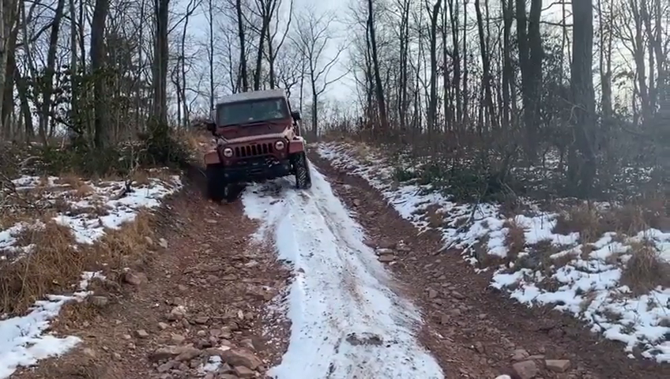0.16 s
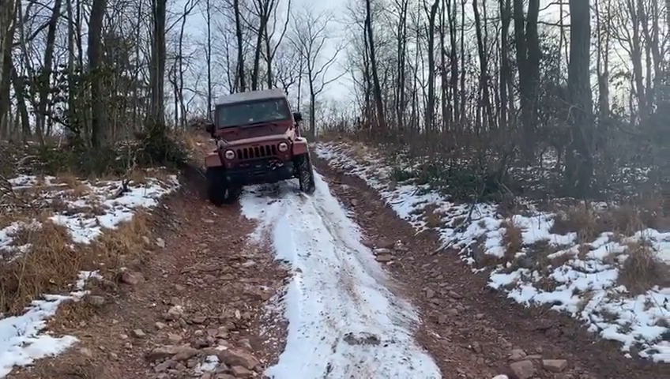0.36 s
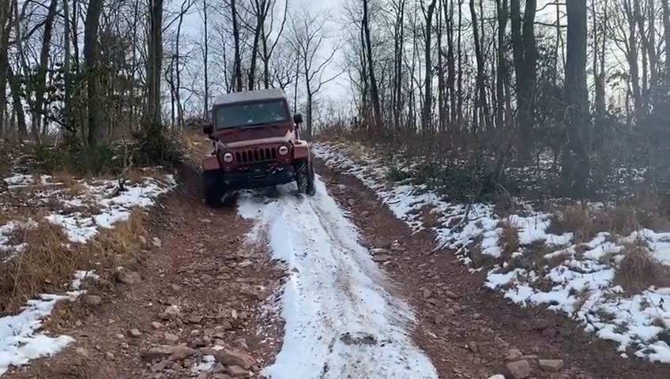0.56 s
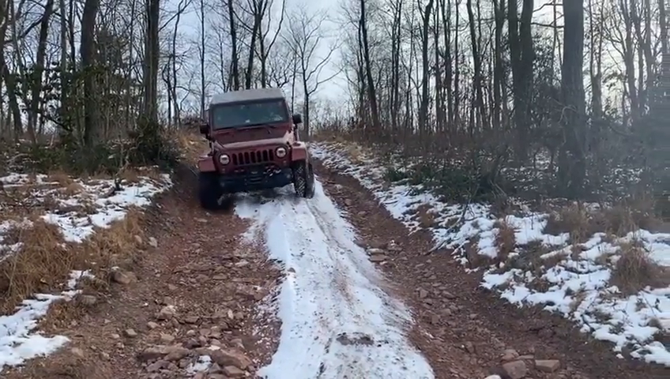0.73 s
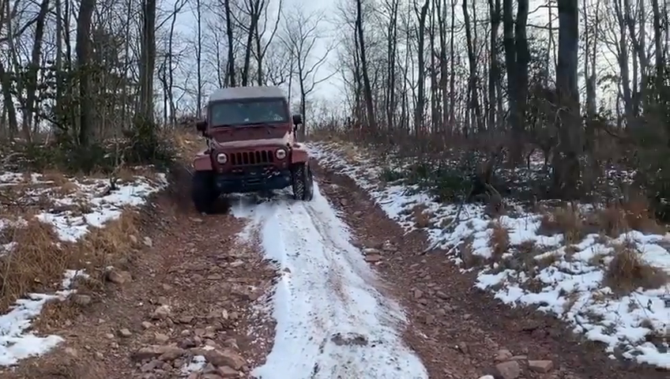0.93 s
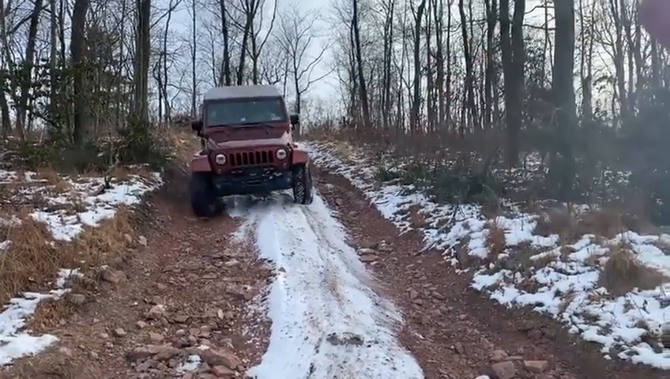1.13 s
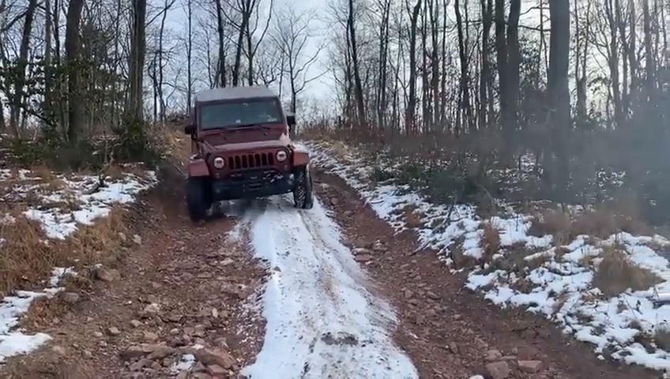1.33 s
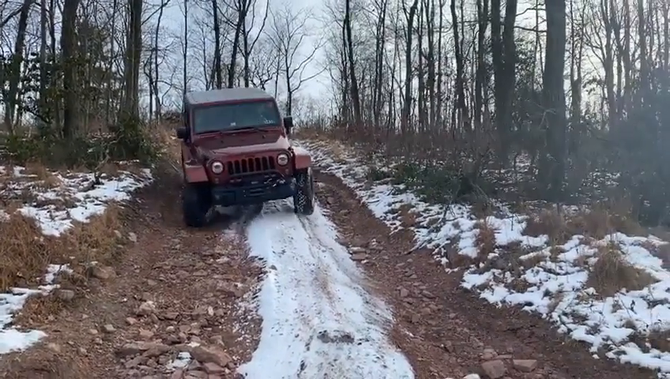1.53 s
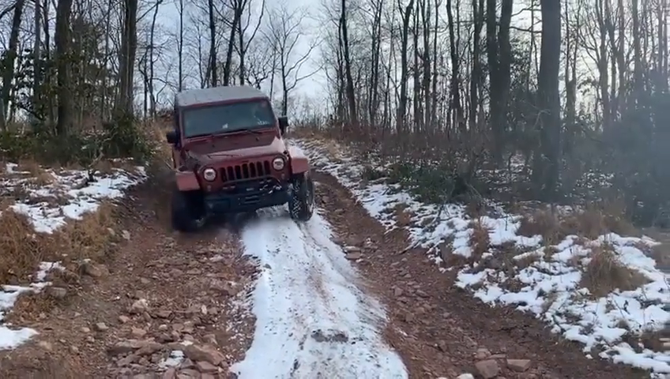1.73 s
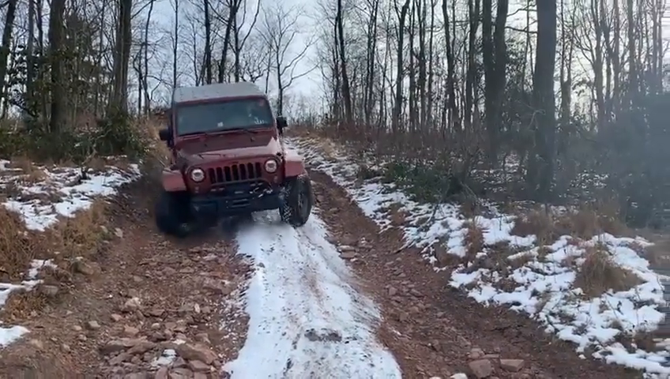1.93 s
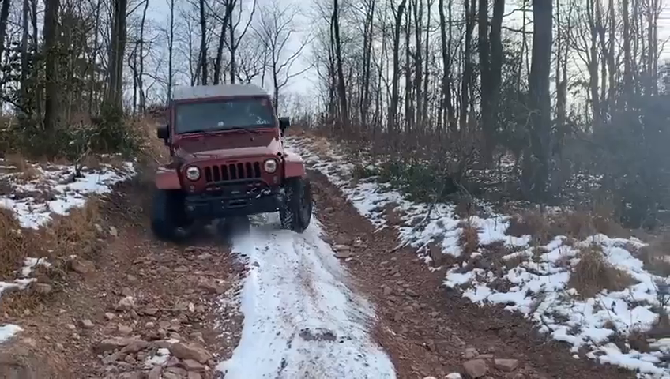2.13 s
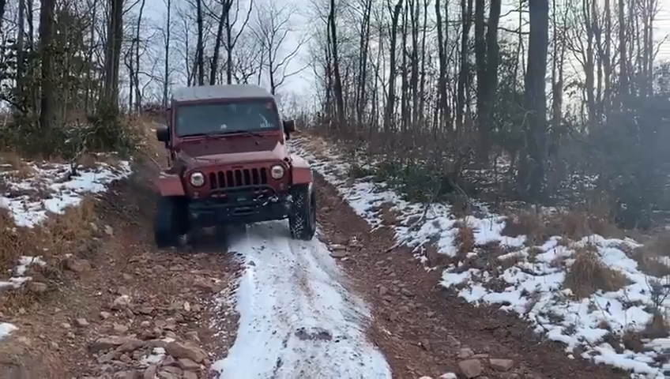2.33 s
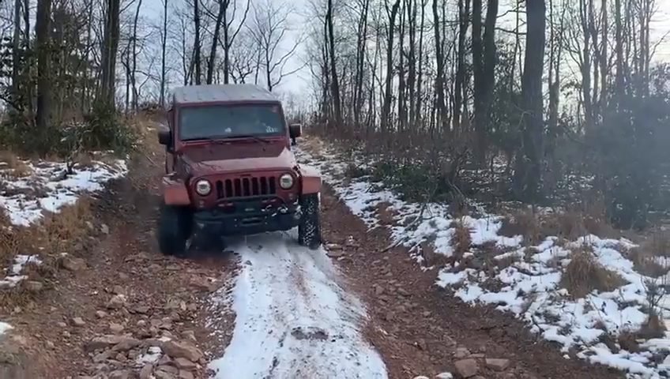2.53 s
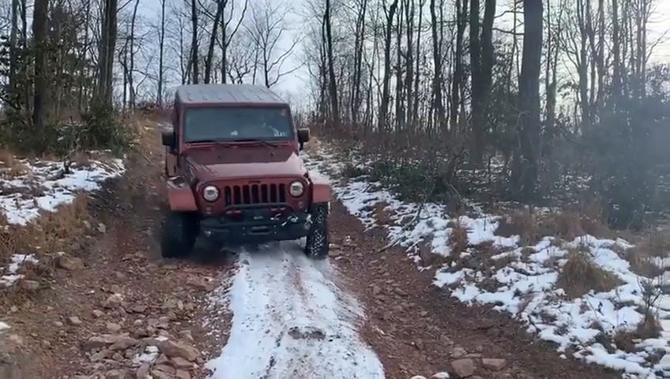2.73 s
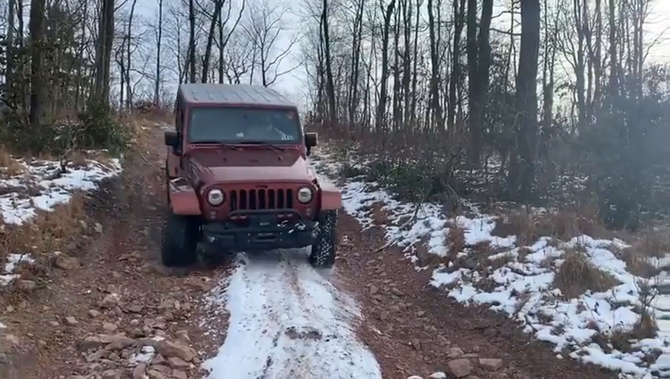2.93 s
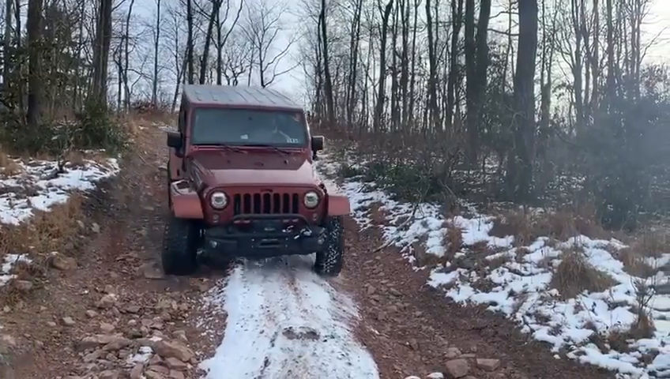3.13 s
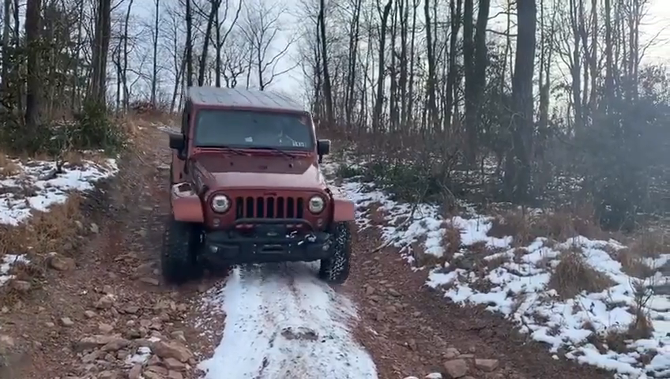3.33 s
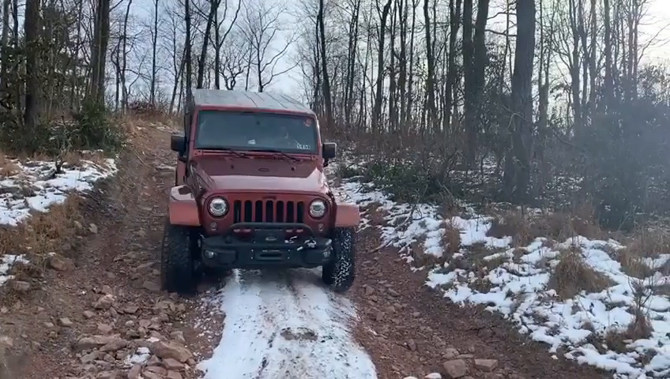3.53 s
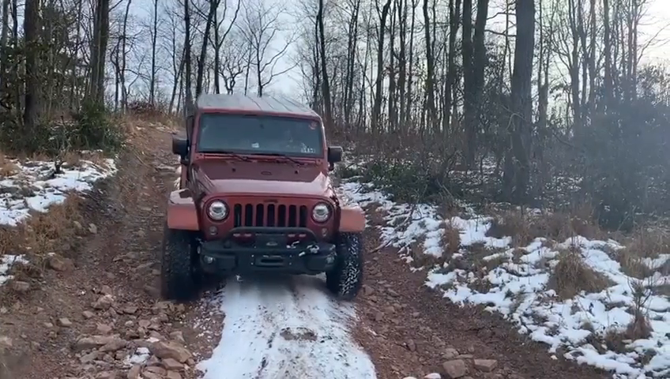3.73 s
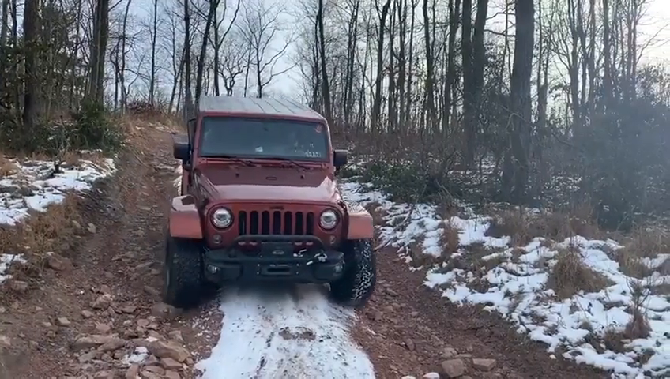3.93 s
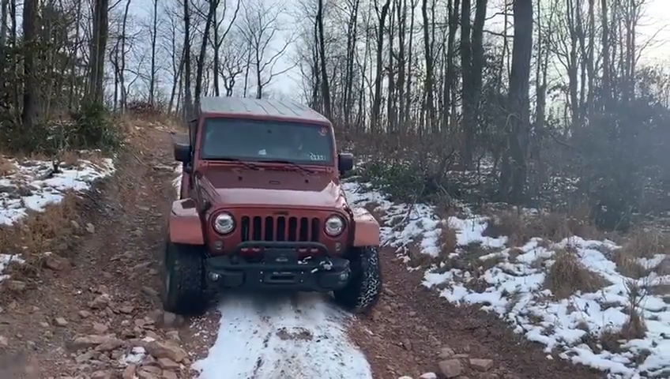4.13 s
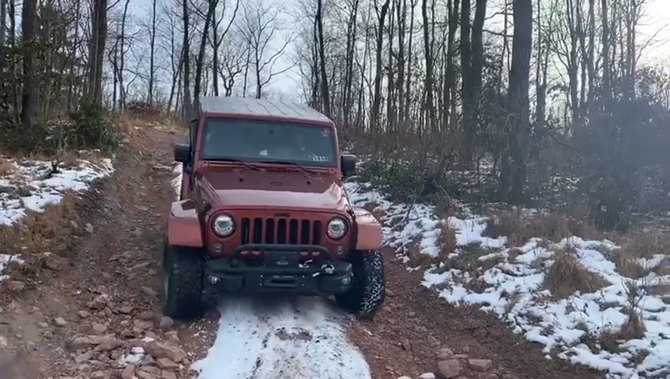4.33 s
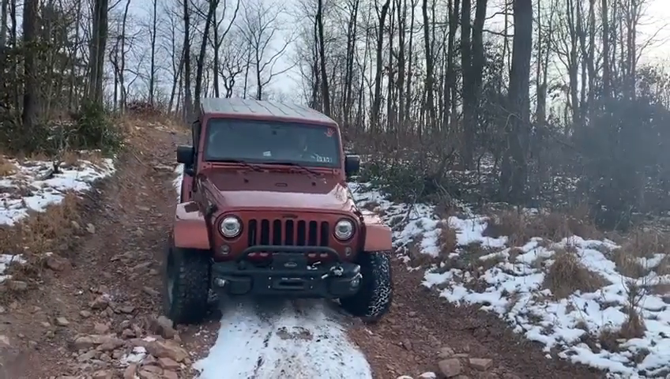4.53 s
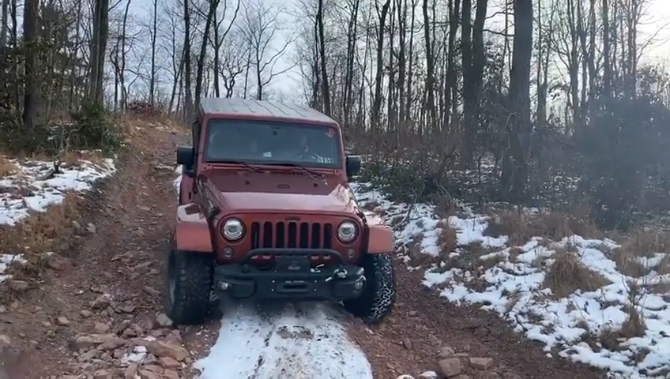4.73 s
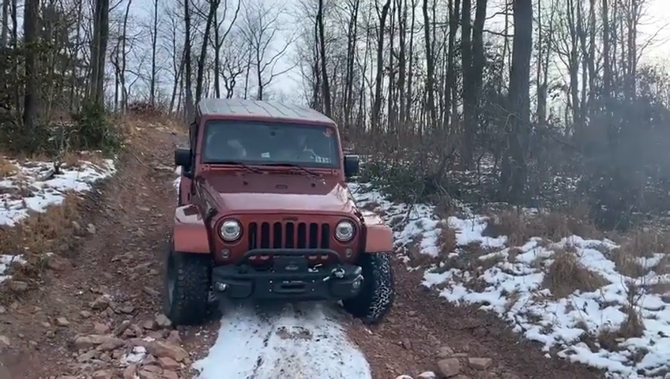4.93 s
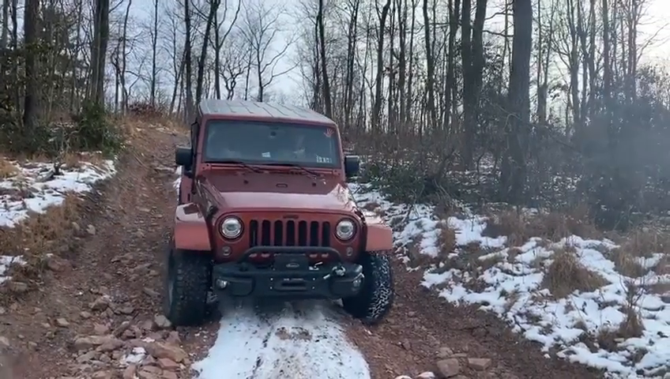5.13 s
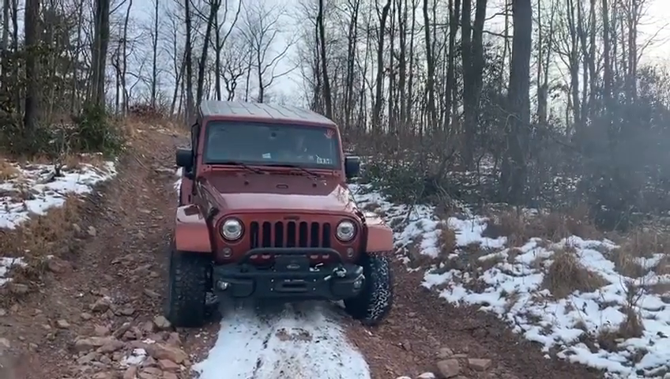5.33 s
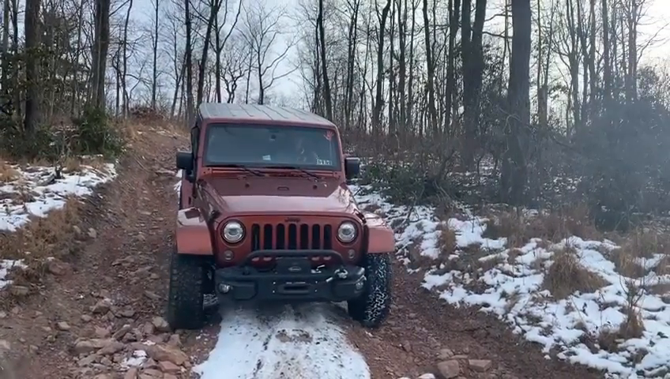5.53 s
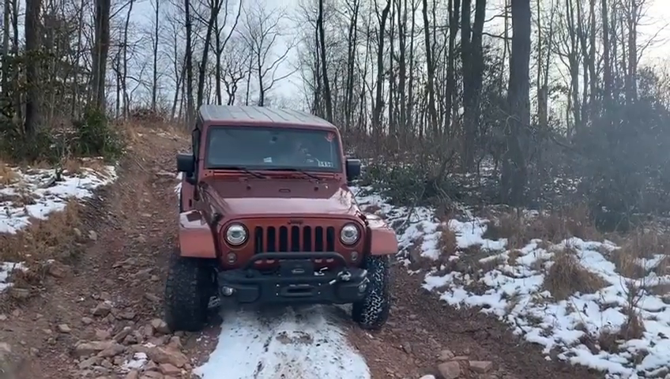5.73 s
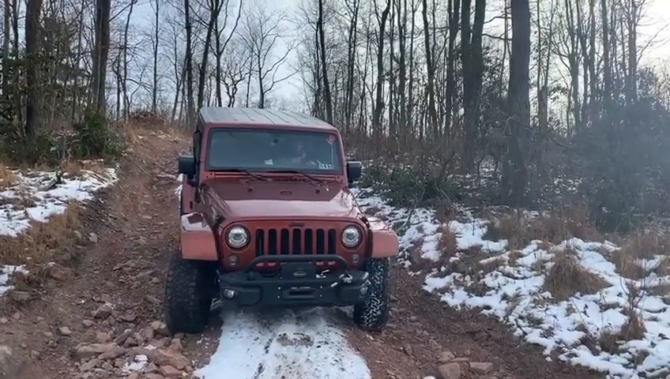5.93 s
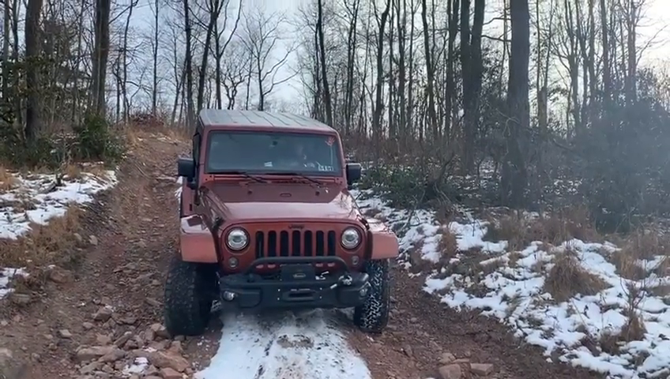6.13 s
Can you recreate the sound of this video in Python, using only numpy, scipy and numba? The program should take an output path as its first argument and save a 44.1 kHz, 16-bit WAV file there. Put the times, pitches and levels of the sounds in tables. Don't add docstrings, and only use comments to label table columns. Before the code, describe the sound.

A heavy off-road vehicle descends a stony, icy forest track towards a phone microphone, its engine idling low and uneven under a soft fan and woodland hiss. From 0 s, stones knock hollow on the tyres, with a strong thump at 0.1 s; crunching crust and sharp snaps gather from 0.5 to 1 s. Around 1.7-2.5 s the rolling is densest: heavy double thump, gritty skids, bright splinters, clods crushed. Small bright chips ping near 2.9 s. From 3 to 4.6 s, irregular crunches, cracks, body booms and stone knocks continue, ending in a blunt thump at 4.7 s. By 5 s it has halted; idle remains, with small cracks near 5.3 s. The fan swells slightly from 5.6 s, a dull crack comes near 5.8 s, and the brake groans steadily, low and quiet, until 6.05 s. A last small crunch and settling knock come near 6.15 s. Trees return a faint short echo.

```python
import sys
import numpy as np
from scipy import signal
from scipy.fft import rfft, irfft
from scipy.io import wavfile
from scipy.ndimage import uniform_filter1d
from numba import njit

SR = 44100
rng = np.random.default_rng(int(sys.argv[2]) if len(sys.argv) > 2 else 0)


def gain_from_decibels(decibels):
    exponent = np.asarray(decibels, float) / 20
    return 10 ** exponent


def waveform_to_disk(signal):
    frames = np.transpose(np.atleast_2d(signal))
    scaled = np.clip(frames, -1, 1) * 32767
    samples = np.round(scaled).astype(np.int16)
    wavfile.write(sys.argv[1], SR, samples)


N = 276859

SPLIT_HZ = 2100
# [f/Hz, density/dB per Hz]
CRUST = [(300, 2), (420, -0.5), (600, -2.5), (960, -3), (1140, -10), (1600, -7.5), (1900, -15.5),
         (2250, -29), (3500, -31.5), (4300, -34), (5400, -29.5), (6500, -30), (7600, -32), (9000, -40.5)]
# [t/s, peak level/dB, ring f/Hz]
SNAPS = [(0.462, -34, 1100), (0.574, -29, 942), (0.601, -34, 842), (0.667, -32, 856), (0.755, -31, 950),
         (0.802, -23, 1090), (0.827, -23, 896), (0.902, -28, 1590), (0.944, -31, 1650), (1.683, -21, 1640),
         (2.09, -26, 939), (2.222, -22, 1420), (2.384, -25, 926), (2.435, -28, 947), (2.459, -23.5, 1750),
         (2.476, -25.5, 974), (2.493, -26, 934), (2.514, -24, 1780), (2.534, -29, 886), (2.6, -25, 1870),
         (2.79, -26, 1650), (2.92, -31, 1610), (2.987, -28.5, 1640), (3.073, -24, 1700), (3.137, -21, 1020),
         (3.454, -20.5, 1760), (3.51, -30, 853), (3.527, -32, 1590), (3.577, -31, 750), (3.657, -25, 900),
         (3.661, -24, 1660), (3.703, -24, 703), (3.725, -22.5, 703), (3.74, -27, 1550),
         (3.795, -25.5, 1320), (3.922, -32, 770), (3.973, -27, 751), (4.08, -23.5, 789),
         (4.16, -23.5, 1560), (4.222, -30, 735), (4.289, -28, 1060), (4.357, -28, 829), (4.406, -29, 1040),
         (4.476, -28, 786), (4.498, -31, 1080), (4.523, -29, 1020), (4.67, -27, 1900), (4.698, -29, 1030),
         (5.248, -33, 1020), (5.297, -29, 970), (6.141, -33, 1040)]


def level(x, db):
    return x * gain_from_decibels(db) / np.sqrt(np.mean(x ** 2))


@njit
def svf(x, hz, width):
    y = np.empty(len(x))
    band, low = 0., 0.
    g, damping = np.tan(np.pi * hz / SR), width / hz
    for i in range(len(x)):
        v = (band + g * (x[i] - low)) / (1 + g * (g + damping))
        band = 2 * v - band
        low = low + 2 * g * v
        y[i] = damping * v
    return y


def ring(x, modes):
    return sum(gain_from_decibels(db) * svf(x, 1. * hz, 1. * width) for hz, width, db in modes)


def colour(x, points):
    hz, db = np.transpose(points)
    grid = np.fft.rfftfreq(4096, 1 / SR)
    curve_db = np.interp(np.log(grid + 1), np.log(hz), db)
    cepstrum = irfft(np.log(gain_from_decibels(curve_db)))
    cepstrum[1:2048] *= 2
    cepstrum[2049:] = 0
    impulse = irfft(np.exp(rfft(cepstrum)))[:2048]
    return signal.fftconvolve(x, impulse)[:len(x)]


def cut(x, hz, kind, order=4):
    return signal.sosfilt(signal.butter(order, hz, kind, fs=SR, output="sos"), x)


def walk(rate):
    hold = int(SR / rate)
    steps = np.repeat(rng.standard_normal(N // 50), hold)[:N]
    return uniform_filter1d(steps, hold // 2)


def grains(rate, spread_db, tail_s, bed):
    size_db = np.minimum(spread_db * rng.exponential(size=N), 9)
    hit = (rng.random(N) < rate / SR) * gain_from_decibels(size_db)
    fade = np.exp(-1 / (tail_s * SR))
    power = signal.lfilter([1], [1, -fade], hit ** 2)
    return level(rng.standard_normal(N) * np.sqrt(power / power.mean() + bed), 0)


def add(out, s, sound):
    i = int(s * SR)
    out[i:i + len(sound)] += sound[:N - i]


def fading(t60, rise_s, hold=1):
    t = np.arange(6000) / SR
    decay = 1000. ** -((t / max(t60, .005)) ** hold)
    return t, (1 - np.exp(-t / rise_s)) * decay


def swells(events):
    t = np.arange(N) / SR
    return sum(gain_from_decibels(2 * db) * np.exp(-((t - s) / half) ** 2) for s, db, half in events)


def nearness():
    halt_s = 5
    return np.clip(np.arange(N) / SR / halt_s, 0, 1)


def rolling():
    # [t/s, bite level/dB]
    bite = [(0.0, -43.5), (0.36, -45), (0.6, -37.5), (1.1, -41.5), (1.3, -37.5), (1.6, -36), (1.75, -33.5),
            (2.03, -36), (2.329, -35), (2.619, -38), (3.3, -36.5), (3.76, -37.5), (3.9, -40.5),
            (4.148, -36.5), (4.491, -40), (4.9, -52), (5.5, -62.5), (5.78, -47.5), (6.28, -60.5)]
    # [t/s, boom level/dB, half length/s]
    lurches = [(0.12, -31, 0.13), (0.33, -31.5, .05), (0.47, -26.5, 0.044), (0.74, -27, 0.049),
               (0.98, -32.5, 0.19), (1.3, -26, 0.063), (1.5, -30, 0.11), (1.75, -21, .04),
               (2.16, -24, 0.09), (2.36, -29, 0.024), (2.52, -27, 0.056), (2.76, -27, 0.044),
               (3.05, -29, 0.13), (3.3, -22.5, 0.095), (3.65, -24.5, 0.074), (4.17, -27.5, 0.08),
               (4.5, -27, 0.099), (4.7, -22.5, 0.061), (5.15, -49, 0.068), (5.75, -40.5, 0.23),
               (6.19, -33, 0.021)]
    # [t/s, knock level/dB, half length/s]
    heaps = [(0.12, -28.5, 0.056), (0.34, -34, 0.25), (0.8, -29.5, 0.17), (1.2, -32.5, 0.057),
             (1.68, -28, 0.052), (2.0, -29, 0.061), (2.17, -21, 0.049), (2.33, -26.5, 0.023),
             (2.72, -27, 0.077), (4.3, -21.5, 0.031), (5.55, -49, 0.063), (5.78, -46, 0.27),
             (6.27, -42, 0.065)]
    # [f/Hz, width/Hz, level/dB]
    tyre = [(162, 26, 8.5), (231, 154, 12), (335.3, 12, 8)]
    # [f/Hz, width/Hz, level/dB]
    body = [(70, 44, 10), (94.3, 19, 1.5), (50, 27, -12.5)]
    t = np.arange(N) / SR
    usual_bite_db = -40
    bite_db = np.interp(t, *np.transpose(bite)) - usual_bite_db
    boom_gain = gain_from_decibels(-39 + 0.93 * bite_db)
    knock_gain = gain_from_decibels(-35 + 1.32 * bite_db)
    crunch_gain = gain_from_decibels(-39.5 + 1.06 * bite_db)
    crackle_gain = gain_from_decibels(-50.5 + 1.26 * bite_db)
    boom_gain = np.sqrt(boom_gain ** 2 + swells(lurches))
    knock_gain = np.sqrt(knock_gain ** 2 + swells(heaps))
    load = walk(30)

    hush_depth, hush_s = .55, .007
    waiting = sum(np.exp(-((t - s) / hush_s + 1) ** 2) for s, _, _ in SNAPS)
    hush = 1 - hush_depth * np.clip(waiting, 0, 1)

    boom = cut(ring(grains(60, 2.6, 0.0031, 4.2), body), 177.0, "low")
    knock = cut(ring(grains(120, 6.9, 0.0073, 0.17), tyre), 88.5, "high")
    knock = cut(knock, 493, "low")
    crust = colour(grains(330, 2.7, 0.0046, 0.13), CRUST)
    crunch = cut(crust, SPLIT_HZ, "low", order=8)
    crackle = cut(crust, SPLIT_HZ, "high", order=8)
    mix = level(boom, 0) * boom_gain * gain_from_decibels(1.1 * load)
    mix += level(knock, 0) * knock_gain * gain_from_decibels(1.65 * load)
    mix += level(crunch, 0) * crunch_gain * hush * gain_from_decibels(1.2 * load)
    mix += level(crackle, 0) * crackle_gain * hush * gain_from_decibels(1.6 * load)
    return mix


def idle():
    # [f/Hz, density/dB per Hz]
    fan_and_woods = [(53, -42), (90, -0.5), (123, -18.5), (288, -30), (371, -21.5), (979, -16.5),
                     (1120, -24), (1390, -18), (1590, -17), (2170, -22), (2530, -26.5), (5300, -36.5),
                     (7370, -38.5), (9300, -41.5), (12100, -78), (20500, -120)]
    firing_hz = 64.35
    phase = np.cumsum(firing_hz * (1 + 0.0343 * walk(30))) / SR
    firings = np.diff(np.floor(phase), prepend=0) * gain_from_decibels(3.4 * walk(40))
    hum = svf(svf(firings, firing_hz, 25.), firing_hz, 40.)
    hiss = colour(rng.standard_normal(N), fan_and_woods) * gain_from_decibels(1.3 * walk(12))
    far_db = 2 * (1 - nearness())
    rev_s, rev_db = 5.58, 2.5
    swell_db = rev_db * np.tanh((np.arange(N) / SR - rev_s) / 0.35)
    return level(hum, -43.5) + level(hiss, -50.5) * gain_from_decibels(far_db + swell_db)


def cracks():
    # [t/s, peak level/dB, centre f/Hz]
    tick_hits = [(0.0543, -43, 2960), (0.2957, -49, 2480), (0.3471, -40, 5780), (0.4045, -32, 7870),
                 (0.6987, -21, 7280), (0.884, -36, 7560), (1.4516, -41, 2800), (2.2657, -37, 4980),
                 (2.4463, -27, 7460), (2.4552, -31, 5630), (2.5133, -27, 2370), (2.6, -28, 2440),
                 (3.0729, -32, 2980), (3.3553, -31, 2920), (3.376, -26.5, 4920), (3.64, -30, 3820),
                 (3.6903, -29, 4000), (4.289, -33, 4800), (4.498, -33, 5000), (5.359, -46, 6500),
                 (3.952, -39, 7750), (4.4273, -34, 2650), (4.5752, -31, 2640), (4.6698, -35, 2480),
                 (5.216, -41, 2340), (5.247, -38, 3160), (5.299, -42, 2820), (5.8192, -41, 2510)]
    # [t/s, peak level/dB, centre f/Hz]
    stone_hits = [(0.116, -27, 458), (0.199, -27, 525), (0.29, -31, 509), (0.461, -29, 530),
                  (0.728, -25, 452), (0.882, -19, 500), (1.142, -30, 533), (1.282, -24, 506),
                  (1.679, -23, 573), (1.82, -16, 907), (1.996, -20, 501), (2.089, -20, 519),
                  (2.17, -15, 452), (2.428, -33, 519), (2.474, -26, 980), (2.599, -37, 1870),
                  (2.88, -23, 452), (3.283, -27, 460), (3.511, -24, 630), (3.594, -25, 670),
                  (3.703, -21, 633), (3.739, -22, 665), (3.792, -15.5, 507), (4.128, -26, 659),
                  (4.247, -19, 538), (4.407, -29, 633), (4.524, -34, 573), (4.555, -26, 624),
                  (6.142, -27.5, 520), (6.188, -34, 703)]
    # [t/s, peak level/dB, centre f/Hz, length t60/s]
    splinters = [(0.119, -33.5, 2610, 0.042), (0.9428, -36, 2690, 0.065), (1.299, -31, 2610, 0.038),
                 (0.4028, -37, 3800, 0.038), (1.9115, -20.5, 3770, 0.034), (1.9959, -34, 3270, 0.054),
                 (2.139, -28, 2860, 0.027), (2.435, -27.5, 2650, 0.058), (2.4925, -31, 2700, 0.055),
                 (2.5137, -27.5, 3600, 0.049), (2.5997, -26.5, 2420, 0.025), (3.0243, -35, 2530, 0.25),
                 (3.0734, -35.5, 2980, 0.23), (3.2794, -33, 2400, 0.23), (3.4526, -28, 3100, 0.043),
                 (3.5072, -33.5, 3680, 0.049), (3.7256, -30.5, 2540, 0.2), (3.9729, -40, 2480, 0.068),
                 (3.9877, -24, 2350, 0.023), (4.0932, -29, 2330, 0.034), (4.159, -32.5, 2340, 0.038),
                 (4.2876, -33.5, 2370, 0.15), (4.4278, -35.5, 3600, 0.037), (4.5756, -25, 2850, 0.059),
                 (4.6692, -36.5, 2420, 0.17), (5.195, -55, 5090, 0.15), (5.2478, -37.5, 2980, 0.071),
                 (5.2964, -27.5, 2760, 0.057), (5.691, -39, 2820, 0.1), (6.1409, -41, 2530, 0.23)]
    # [t/s, peak level/dB, centre f/Hz]
    grit_hits = [(0.4045, -39, 8500), (0.476, -36, 8200), (0.696, -45.5, 7850), (0.7256, -28.5, 5860),
                 (1.127, -38, 5500), (1.527, -32.5, 5440), (1.6703, -36, 5900), (1.8842, -23, 5340),
                 (1.9, -30, 5500), (2.062, -33.5, 5860), (2.09, -31.5, 7240), (2.158, -33, 5250),
                 (2.223, -34, 5600), (2.3284, -31.5, 5330), (2.4548, -27, 4470), (2.584, -33.5, 5660),
                 (3.259, -36, 5600), (3.28, -33, 5570), (3.3735, -28, 4830), (3.453, -35, 5560),
                 (3.684, -33, 5900), (3.793, -29, 5400), (3.8117, -31.5, 5900), (3.975, -36, 5700),
                 (4.012, -34.5, 7600), (4.2003, -41, 6850), (4.239, -42, 6250), (4.577, -36, 5600)]
    # [t/s, peak level/dB]
    clod_hits = [(0.462, -28.5), (0.574, -28.5), (0.636, -21), (0.662, -23.5), (0.792, -21), (0.822, -20),
                 (1.221, -29), (1.299, -18.5), (1.391, -20), (1.454, -18), (1.776, -25), (2.322, -15.5),
                 (2.664, -26), (3.51, -30), (3.66, -16), (3.703, -26), (3.726, -26), (3.923, -25.5),
                 (4.067, -26), (4.291, -23), (4.344, -26), (4.156, -20.5), (4.247, -24), (4.305, -30),
                 (4.333, -14.5), (4.427, -19), (6.188, -30.5)]
    # [t/s, peak level/dB, centre f/Hz, length t60/s]
    slabs = [(0.755, -30.5, 950, 0.13), (0.943, -23.5, 1690, 0.034), (1.346, -28.5, 920, 0.094),
             (1.581, -29, 850.6, 0.31), (1.682, -21.5, 1610, 0.031), (1.75, -14.5, 980, 0.026),
             (2.089, -24, 950, 0.093), (1.89, -23, 1155, 0.25), (2.0, -23, 1640, 0.088),
             (2.197, -26, 1560, 0.06), (2.374, -28, 910, 0.048), (2.456, -20, 1770, 0.05),
             (2.492, -26, 1750, 0.033), (2.515, -24.5, 1800, 0.066), (3.073, -21.5, 1740, 0.075),
             (4.425, -20.5, 1010, 0.051), (3.353, -19.5, 910, 0.02), (3.376, -17.5, 750, 0.049),
             (3.446, -20, 869, 0.06), (3.446, -25, 1710, 0.06), (3.66, -25.5, 1670, 0.076),
             (3.725, -27, 1620, 0.11), (4.409, -39, 900, 0.032), (4.575, -23.5, 970, 0.044),
             (4.669, -25.5, 1920, 0.018), (5.247, -29, 1000, 0.054), (5.296, -25.5, 970, 0.04),
             (5.691, -28, 920, 0.054), (5.766, -15, 716, 0.017), (6.14, -29.5, 900, 0.036)]
    rattle = colour(grains(570, 0.67, 0.0023, 14.0), CRUST)
    dull, bright = cut(rattle, SPLIT_HZ, "low"), cut(rattle, SPLIT_HZ, "high")
    ticks = [(s, db - 1, hz, 0.012) for s, db, hz in tick_hits]
    stones = [(s, db - 3.5, hz, 0.042) for s, db, hz in stone_hits]
    grit = [(s, db, hz, 0.042) for s, db, hz in grit_hits]
    clods = [(s, db, 526, .075) for s, db in clod_hits]
    # events, source noise, bandwidth over centre, rise in s
    families = ((clods, dull, .7, .005), (slabs + stones, dull, .4, .001),
                (ticks, bright, 1.5, .0004), (splinters + grit, bright, .8, .0015))
    out = np.zeros(N)
    for events, stuff, breadth, rise_s in families:
        for s, db, hz, t60 in events:
            t, env = fading(0.88 * t60, rise_s, hold=1.113)
            part = stuff[int(s * SR * .95):][:len(t)]
            band = svf(svf(part, 1. * hz, breadth * hz), 1. * hz, 1. * hz)
            add(out, s, gain_from_decibels(db - 4) * env * level(band, 0))
    return out


def thumps():
    # [t/s, peak level/dB, ring f/Hz, ring t60/s]
    tyre_hits = [(0.069, -13, 229, 0.03), (0.1206, 4.5, 312, 0.023), (0.456, -14, 104.3, 0.25),
                 (0.779, -7, 173, 0.065), (0.902, 0, 242, 0.029), (1.746, 2.5, 340, 0.054),
                 (1.35, -8.5, 232, 0.076), (1.553, -15, 148, 0.35), (1.743, 6, 213, 0.046),
                 (1.997, -8, 208, 0.045), (2.107, -7, 122, 0.18), (2.17, 0, 182, 0.035),
                 (2.268, -2, 376, 0.069), (2.507, -13, 155, 0.064), (2.653, -20, 185, 0.044),
                 (2.708, -7.5, 145, 0.12), (2.87, -13.5, 175, 0.11), (3.032, -5, 243, 0.057),
                 (3.075, -7.5, 124, 0.054), (3.129, -6.5, 164, 0.16), (3.331, -7.5, 122.7, 0.055),
                 (3.542, -12, 152, 0.054), (3.661, -13, 236, 0.12), (3.745, -5, 151, 0.038),
                 (3.951, -14, 182, 0.072), (4.134, -10, 165, 0.084), (4.284, -18, 215, 0.041),
                 (4.371, -4, 148, 0.042), (4.558, -16, 162, 0.045), (4.701, 10, 158, 0.011),
                 (3.398, -11, 200, .02), (3.635, -12, 110, .05), (4.327, -3, 230, 0.037),
                 (4.381, -15, 260, .03), (0.73, -12, 130, 0.074)]
    # [t/s, peak level/dB, ring f/Hz, ring t60/s]
    settling = [(4.616, -10, 92.5, 0.23), (4.648, -15, 76, 0.12), (4.829, -20, 83.4, 0.37),
                (5.075, -22, 70.6, 0.12), (5.503, -25, 75.4, 0.088), (5.941, -24, 220, 0.08),
                (6.161, -33, 83.4, 0.08), (6.189, -27, 91, 0.11)]
    out = np.zeros(N)
    for s, db, hz, t60 in tyre_hits + settling:
        t, env = fading(t60, 0.0037)
        add(out, s, gain_from_decibels(db - 5.5) * env * np.sin(2 * np.pi * hz * t * (1 - 0.7 * t)))
    return out


def snaps():
    out = np.zeros(N)
    click = np.eye(1, 6000)[0]
    edge = cut(colour(click, CRUST), 1500, "high", order=2)
    edge = edge / np.abs(edge).max()
    for s, db, hz in SNAPS:
        t, env = fading(12 / hz, 0.00046)
        add(out, s, gain_from_decibels(db + 2) * (env * np.sin(2 * np.pi * hz * t) + gain_from_decibels(-7) * edge))
    return out


def pings():
    # [t/s, peak level/dB, f/Hz, t60/s]
    chips = [
        (0.5132, -48, 7740, 0.028),
        (0.737, -38, 8400, 0.014),
        (2.9076, -27, 5100, 0.013),
        (2.9432, -29.5, 5910, 0.022),
        (2.9637, -36, 5810, 0.023),
        (3.7032, -18, 650, .014),
        (3.7255, -16.5, 800, .012),
        (4.3405, -16, 420, .015),
        (5.5, -36, 480, .025),
    ]
    out = np.zeros(N)
    for s, db, hz, t60 in chips:
        t, env = fading(t60, 0.00025)
        add(out, s, gain_from_decibels(db) * env * np.sin(2 * np.pi * hz * t))
    return out


def skids():
    # [t/s, level/dB, centre f/Hz, half length/s]
    grinds = [(0.6, -49, 1800, 0.045), (0.64, -46, 920, .04), (1.3, -45.5, 750, 0.097),
              (2.1, -44, 1700, 0.026), (1.905, -31.5, 1430, 0.014), (1.908, -37, 5000, 0.017),
              (2.14, -35.5, 1600, 0.038), (2.215, -30, 1750, 0.022), (2.139, -40, 520, .02),
              (2.34, -38.5, 950, 0.037), (2.34, -35, 1530, 0.053), (3.1, -40, 1170, 0.076),
              (3.3, -39, 1480, 0.041), (4, -47.5, 5300, .03), (3.55, -51, 1800, .03),
              (3.75, -40, 1520, 0.028), (3.81, -38, 1740, 0.022), (4.054, -39, 680, 0.1),
              (4.248, -41, 570, 0.016), (4.339, -40, 590, 0.028), (4.36, -50, 1800, 0.022),
              (4.493, -33.5, 540, 0.044), (4.48, -48, 1500, 0.032), (4.705, -37, 660, 0.013),
              (5.23, -56.5, 3700, .04), (5.55, -55, 580, .08), (5.33, -53, 600, 0.06),
              (4.5, -50, 2800, 0.024), (3.8, -48, 3200, 0.026), (3.2, -35.5, 1030, 0.025),
              (1.2, -36, 300, 0.069), (2.1, -31.5, 330, .02), (3.7, -28, 310, 0.0083)]
    out = np.zeros(N)
    grind = colour(grains(700, 1.5, 0.003, 1.5), CRUST)
    t = np.arange(-6000, 6000) / SR
    for s, db, hz, half in grinds:
        part = grind[int(s * SR * .9):][:len(t)]
        band = svf(svf(part, 1. * hz, 0.58 * hz), 1. * hz, 1.1 * hz)
        add(out, s + t[0], np.exp(-(t / half) ** 2) * level(band, db))
    return out


def groan():
    # [t/s, pitch f/Hz, level/dB]
    glide = [
        (5.79, 225.6, -50),
        (5.8, 223, -65),
        (5.812, 222.5, -41.5),
        (5.988, 225, -42.5),
        (6.06, 224.7, -68),
    ]
    # [multiple of the pitch, level/dB]
    overtones = [(2, -9.5), (3, -22)]
    s, hz, db = np.transpose(glide)
    t = np.arange(N) / SR
    pitch = np.interp(t, s, hz) * (1 + 0.0081 * walk(60))
    phase = 2 * np.pi * np.cumsum(pitch) / SR
    tone = np.sin(phase)
    for multiple, overtone_db in overtones:
        tone = tone + gain_from_decibels(overtone_db + 2.5 * walk(30)) * np.sin(multiple * phase)
    gate = uniform_filter1d(1. * (t > s[0]) * (t < s[-1]), 800)
    return np.sqrt(2) * gate * tone * gain_from_decibels(np.interp(t, s, db))


def tree_echo(near):
    t = np.arange(8000) / SR
    trees = level(rng.standard_normal(len(t)) * 1000. ** (-t / 0.12), -54.0)
    return cut(signal.fftconvolve(near, trees)[:N], 420, "high", order=2)


def ground_echo(heard):
    # [f/Hz, width/Hz, depth/0-1, deepest t/s, half length/s]
    dips = [(1136, 63, 0.6, 3, 9), (2054, 430, 0.53, -0.5, 3.7), (2250, 200, 0.8, 1.8, 0.5),
            (2640, 150, 0.8, 3.5, 0.59), (2760, 120, 0.7, 4, 0.37), (3470, 200, 0.8, .5, 1.2),
            (4800, 300, .9, 0.1, .5), (4470, 300, .9, 1, 0.33), (4680, 300, .9, 1.35, .4),
            (3970, 200, 0.6, 3, .3), (4330, 300, 0.9, 3, 0.37), (4160, 300, .9, 4, .4),
            (4340, 300, 0.8, 4, 0.46), (4200, 210, 0.7, 6, 0.35), (4230, 180, .5, 6.5, 1),
            (6760, 950, .95, 0.5, 0.53), (6320, 860, .95, 0, 0.36), (6450, 1000, .95, 1.3, 0.35),
            (6800, 580, .85, 3.2, .3)]
    t = np.arange(N) / SR
    for hz, width, depth, s, half in dips:
        amount = np.clip(depth, 0, .97) * np.exp(-((t - s) / half) ** 2)
        heard = heard - amount * svf(heard, 1. * hz, 1. * width)
    return heard


def scene():
    near = rolling() + cracks() + thumps() + snaps() + pings() + skids() + groan()
    return ground_echo(near + tree_echo(near) + idle())[None]


def low_pass(x):
    return signal.sosfilt(signal.butter(12, 9960, fs=SR, output="sos"), x)


def record(dry):
    top = signal.cheby2(10, 60, 9590 + 1100, fs=SR, output="sos")
    heard = signal.sosfilt(top, cut(dry, 40, "high", order=3))
    return low_pass(heard)


dry = scene()
out = record(dry)
waveform_to_disk(out)
```